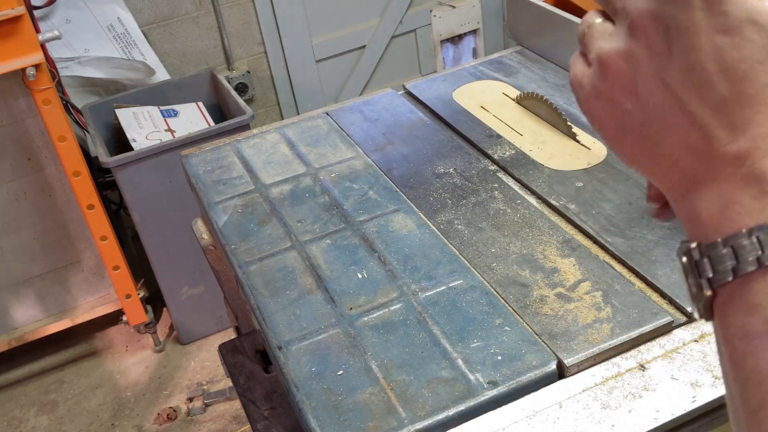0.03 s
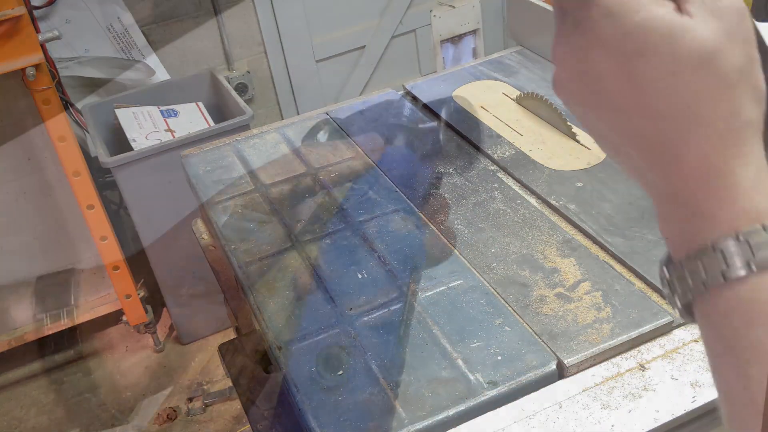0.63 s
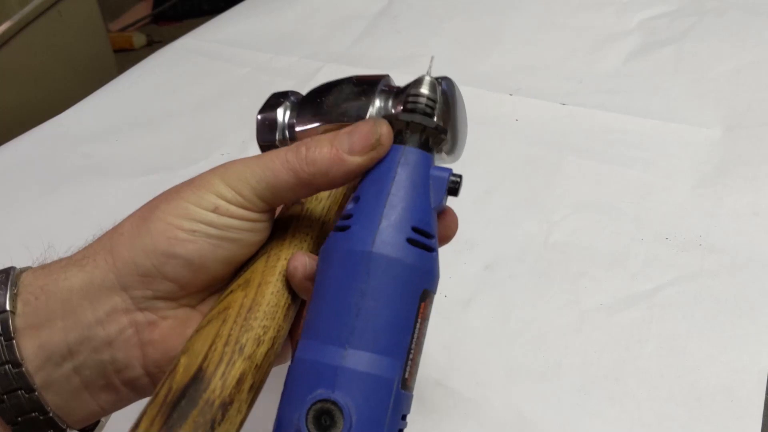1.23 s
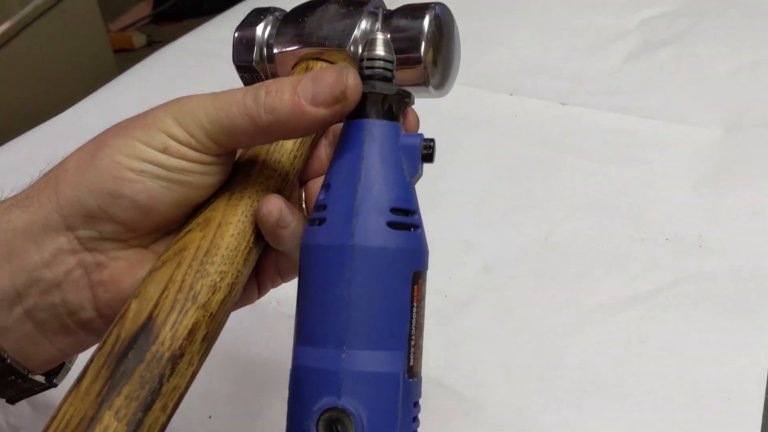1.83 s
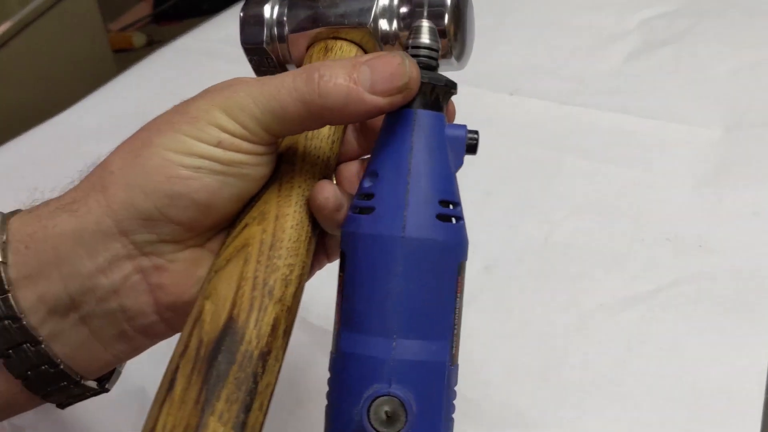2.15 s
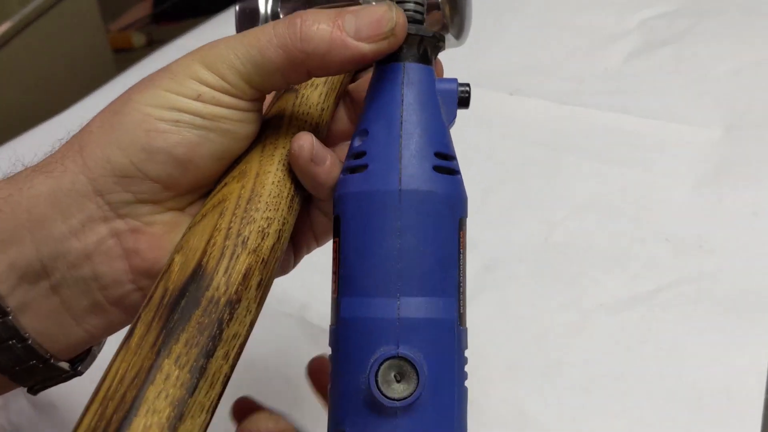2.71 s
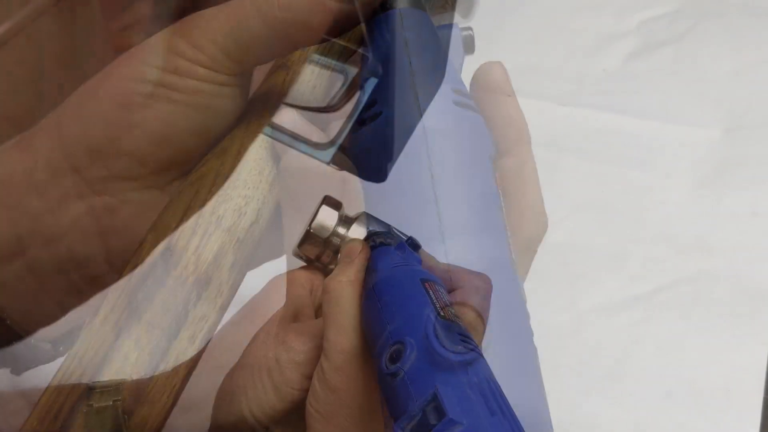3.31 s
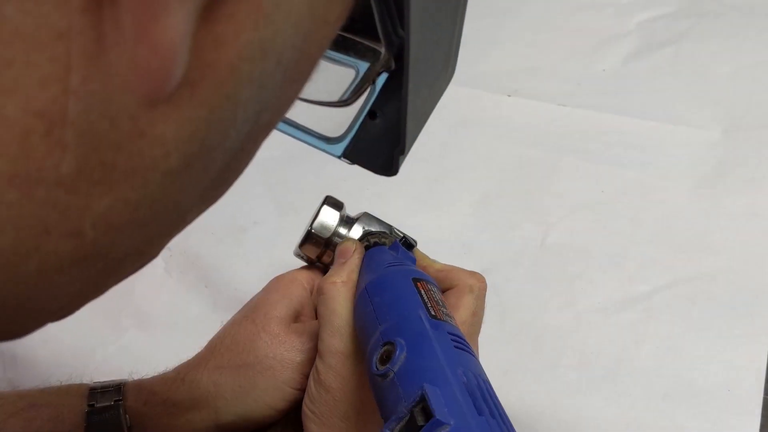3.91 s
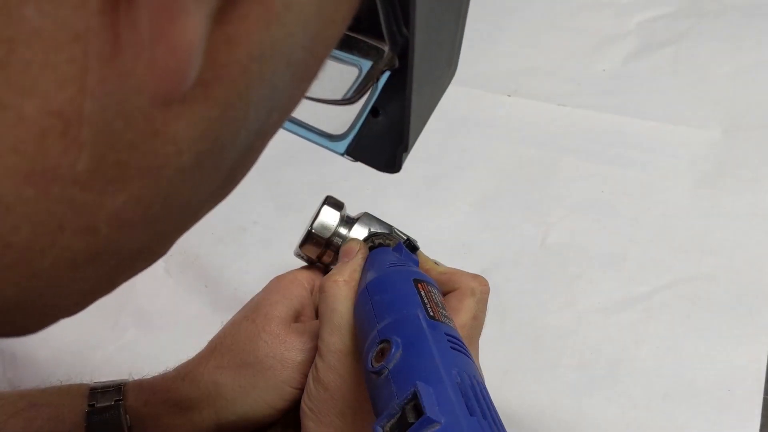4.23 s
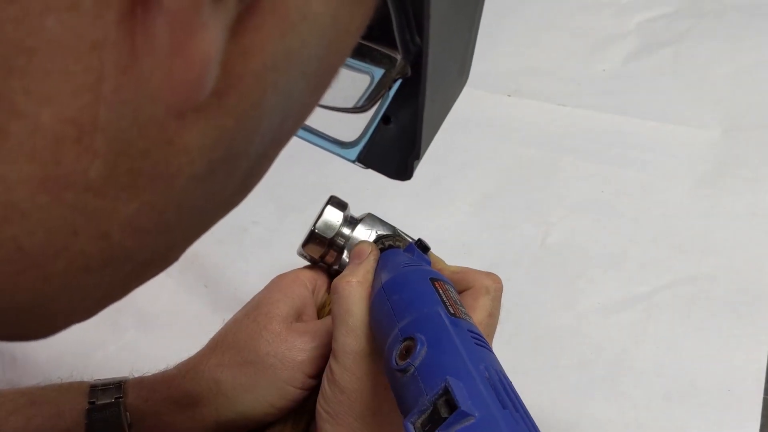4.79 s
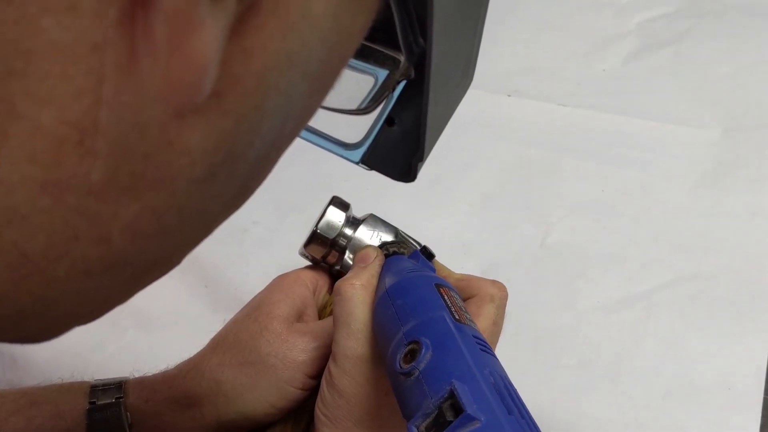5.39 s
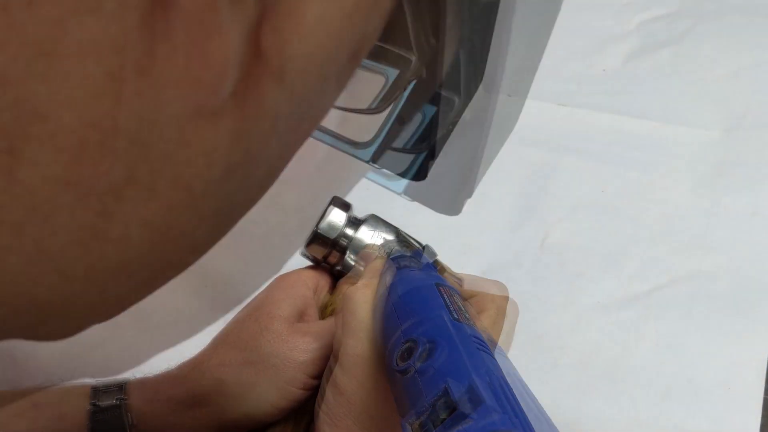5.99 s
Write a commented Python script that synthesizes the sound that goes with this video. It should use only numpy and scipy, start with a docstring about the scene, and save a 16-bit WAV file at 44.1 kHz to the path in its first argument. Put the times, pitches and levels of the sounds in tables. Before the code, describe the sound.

For the first second, hands rub and scrape softly over a workbench, with a few light knocks around 0.2 seconds and a faint low workshop rumble behind. At 1 second a switch snaps with a double click, and a handheld electric rotary tool starts with a crackly buzz. Its whine climbs quickly, then levels off amid a rush of cooling air. From about 2.4 to 2.8 seconds the air buffets the microphone on the left with low thumps. Between 3.1 and 3.6 seconds the free running blends into engraving on a steel hammerhead: a high whine with fine gritty hiss. In about six short strokes the pitch sags slightly and thin squealing overtones appear. Scratchy chatter comes near 4.2, 5.2, 5.7 and 6 seconds. From 5.6 seconds the sound begins blending into a heavier, slightly lower stroke, still running at the end.

```python
"""A mains rotary tool whines up to speed and engraves a steel hammerhead in a workshop. First hands rub
and knock over the bench and a switch snaps. Armature slots sing during the inrush of current; then
unbalance, fan and cooling air take over, and the air briefly buffets the left microphone. The free run
fades into the work: the burr hisses and chatters, the speed sags under each stroke, and overtones excite
the resonances of the steel. At the end the sound fades into a heavier stroke."""
import sys
import numpy as np
from scipy import signal
from scipy.fft import rfft, irfft
from scipy.io import wavfile
from scipy.ndimage import uniform_filter1d

SR = 44100
rng = np.random.default_rng(int(sys.argv[2]) if len(sys.argv) > 2 else 0)


def to_wav(sig):
    """Store sig (one row per channel, or 1-D mono) as 16-bit WAV at the path in sys.argv[1].

    Samples outside -1..1 are clipped; the rate is SR.
    """
    pcm = np.clip(np.atleast_2d(sig), -1, 1) * 32767
    pcm = np.round(pcm).astype(np.int16)
    wavfile.write(sys.argv[1], SR, pcm.T)  # frames by channels


N = 271215
T = np.arange(N) / SR

# Noise spectra. Each row: frequency in Hz, relative spectral density in dB.
RUMBLE_SPECTRUM = [(15, -32), (25, 11.5), (70, 11), (305, -0.5), (484, -5.5), (718, -7.5), (852, -11),
                   (1500, -5.5), (1950, -37), (3300, -120)]
QUIET_SPECTRUM = [(25, -24), (100, -7), (200, -10), (900, 1), (2000, -28), (8000, -36)]
SKIN_SPECTRUM = [(240, -27), (400, -9.5), (605, -10.5), (715, -13), (886, -10), (1050, -12), (3010, -5.5),
                 (7910, -12), (12100, -6), (15500, -13.5)]
SPARK_SPECTRUM = [(500, -7), (1500, -1), (4000, 9.5), (7000, -1), (12000, -4), (15500, -11)]
AIR_SPECTRUM = [(30, -48), (200, -34), (450, -16.5), (800, -11), (1150, -3), (1400, -2), (1750, 5.5),
                (2300, -4.5), (3500, -5.5), (7000, -9), (9000, -7.5), (11000, -3.5), (13000, -4.5),
                (15500, -11.5)]
GRIT_SPECTRUM = [(300, -28), (1400, -27.5), (2600, -23), (3600, -13.5), (5000, -8.5), (6800, 1),
                 (7900, -2.5), (8700, 2), (10500, 0), (12500, -3.5), (15500, -7)]
# Stereo images. Each row: frequency in Hz, coherence, left minus right in dB, left phase lead in radians.
ROOM_STEREO = [(60, 0.8, 0, 0), (1500, 1, 0, 0)]
SKIN_STEREO = [(693, 0.13, 1.5, -1.1), (2100, 0.23, 0.5, -0.43), (6050, 0.3, 0.5, -.7),
               (9000, 1, -1, -0.098), (12900, 0.8, -8, 0)]
AIR_STEREO = [(300, 0.84, 7, 0.1), (750, 0.78, -1.5, 0.33), (1800, 0.68, 4.5, 1.17), (3500, 0.62, 1, 2),
              (6340, 0.081, 5, 3), (9100, 1, -1, 0), (15000, 0.85, -7.5, 0)]
GRIT_STEREO = [(1370, 1, 0.5, 0), (3400, 1, -2.5, -0.46), (6660, 0.52, 2, 0.67), (9000, .5, 4.5, -.2),
               (10800, 0.33, 2, -0.79), (14000, .72, 0.5, .1)]
# Resonances of the scraped object, the switch, the tool (as driven by slots, unbalance and fan), the
# steel and the burr. Each row: frequency in Hz, bandwidth in Hz, gain in dB.
OBJECT_RESONANCES = [(417, 130, -12), (864, 110, -1), (1540, 65, -7), (2093, 89, 8.5), (3330, 130, -3.5),
                     (3430, 140, -12)]
SWITCH_RESONANCES = [(3180, 113, 8), (4440, 580, -18), (6200, 1000, 2.5), (8100, 760, -3),
                     (10100, 3200, 2.5), (13400, 3000, -10)]
SLOT_RESONANCES = [(2400, 310, -1), (3570, 1100, -14)]
UNBALANCE_RESONANCES = [(604.4, 12.6, 2.9), (1134, 130, 8.6)]
FAN_RESONANCES = [(9830, 210, 2.9)]
STEEL_RESONANCES = [(7250, 260, 0), (10780, 60, 0), (10970, 90, 2), (14400, 110, 0)]
BURR_RESONANCES = [(3070, 480, -5), (4420, 750, -1)]
# Room hums during handling, free run and work. Each row: frequency in Hz, level in dB.
EARLY_HUMS = [(119, -58.5), (241, -61.5), (479, -64)]
MIDDLE_HUMS = [(119, -62)]
LATE_HUMS = [(166.9, -71), (436.0, -78), (721.4, -65), (834.4, -83), (872.1, -77)]
# Sliding hands. Each row: start and end in seconds, hiss gain in dB, scrape gain in dB.
HAND_RUBS = [(0.0, 0.08, -61, -59.5), (0.091, 0.164, -46.5, -43.5), (0.158, 0.236, -56.5, -48),
             (0.28, 0.41, -51, -51.5), (0.416, 0.598, -47, -69), (0.622, 0.68, -57, -72),
             (0.701, 0.848, -50.5, -72), (0.888, 0.97, -52, -70)]
# Knocks on the object. Each row: time in seconds, peak of the ringing in dB, peak of the thud in dB.
OBJECT_KNOCKS = [(0.143, -43, -28), (0.188, -28, -57), (0.197, -25.5, -51)]
# Switch clicks. Each row: time in seconds, then gains of snap, housing ring and thud in dB.
SWITCH_CLICKS = [(0.992, -12, -29, -60), (1.092, -26, -21.5, -31.5)]
# Weak partials of shaft and bearings. Each entry: a multiple of the shaft rate; below, its gain in dB.
BEARING_ORDERS = [3, 4, 5, 5.43, 6, 7, 8, 9, 10, 11, 16, 17, 19]
BEARING_GAINS_DB = [-11, -12, -12, -16, -15, -15, -14.5, -16, -21, -24, -23, -12, -15]
# The hardest buffets of air. Each row: time in seconds, peak in dB, Gaussian width in seconds.
AIR_BUFFETS = [(2.421, -12.5, 0.0013), (2.447, -16, 0.001), (2.489, -6.5, 0.0007), (2.503, -8, 0.00043),
               (2.745, -25, 0.0012)]
# Strokes of the burr. Each row: touch and lift in seconds, shaft speed lost in Hz, squeal gain in dB.
BURR_STROKES = [(3.411, 3.849, 13.4, -1), (4.13, 4.509, 12.8, -1.5), (4.817, 5.069, 12.8, 1),
                (5.234, 5.451, 12.6, 1.5), (5.591, 5.794, 4.8, -1), (5.885, 6.114, 9.1, -5)]
# Overtones of the whine. Each row: harmonic number, gain in dB when free, gain in dB when cutting.
WHINE_OVERTONES = [(2, -41.5, -34), (3, -41.5, -33.5), (4, -48, -35.5)]
# Spells of chatter. Each row: start and end in seconds, level in dB.
CHATTER_SPELLS = [(4.147, 4.323, -45.5), (5.18, 5.225, -47.5), (5.6, 5.76, -50), (5.96, 6.027, -52)]
# The heavy stroke. Its row: touch and lift in seconds, shaft speed lost in Hz.
HEAVY_CUT = [(5.62, 6.09, 13.0)]
# Its whine. Each row: harmonic number, level in dB.
HEAVY_HARMONICS = [(1, -39.5), (2, -33.5), (3, -30.5), (4, -38)]
# Quick and slow parts of the spin-up. Each row: shaft speed gained in Hz, time constant in seconds.
SPIN_UP_STAGES = [(245.7, .127), (374.6, .62)]

MAINS_HZ, SWITCH_ON_S = 60, 0.992
WORK_SHAFT_HZ, HEAVY_SHAFT_HZ = 614.9, 599.5  # without load
TO_WORK_S, TO_HEAVY_S = (3.075, 3.58), (5.58, 6.56)  # start and end of the crossfades


def undb(db):
    """Decibels express an amplitude ratio logarithmically."""
    return 10 ** (np.asarray(db) / 20)


def fade(start, end):
    """A linear ramp from 0 to 1."""
    return np.clip((T - start) / (end - start), 0, 1)


def gate(start, end, attack_s, release_s):
    """An envelope rises linearly, holds, and decays exponentially after the end."""
    return fade(start, start + attack_s) * np.exp(-np.clip((T - end) / release_s, 0, 40))


def pan(db):
    """A level difference, left minus right, places a source."""
    return undb(np.array([[.5], [-.5]]) * db)


def walk(rate):
    """Slow random modulation: steps held 1 / rate seconds and smoothed twice, with spread near 1."""
    hold = max(int(SR / rate), 1)
    steps = np.repeat(rng.standard_normal(N // hold + 1), hold)
    return 1.3 * uniform_filter1d(uniform_filter1d(steps, hold), hold)[:N]


def noise(spectrum, image, band):
    """Partly coherent stereo noise; the mean of its channels has rms 1 inside the band."""
    hz = np.maximum(np.fft.rfftfreq(N, 1 / SR), 1)

    def curve(rows, column):
        rows = np.array(rows)
        return np.interp(np.log(hz), np.log(rows[:, 0]), rows[:, column])

    coherence, sign = np.clip(curve(image, 1), -1, 1), np.array([[1], [-1]])
    mid, side = rfft(rng.standard_normal((2, N)))
    bins = (mid * np.sqrt(1 + coherence) + sign * side * np.sqrt(1 - coherence)) * undb(curve(spectrum, 1))
    bins = bins * pan(curve(image, 2)) * np.exp(.5j * sign * curve(image, 3))
    in_band = bins.mean(0) * (hz > band[0]) * (hz < band[1])
    return irfft(bins, N) / irfft(in_band, N).std()


def tone(angle, db, scatter, lead=0, rate=25):
    """Turbulence and reflections scatter a tone, so it wavers differently in each channel."""
    paths = np.array([1 + scatter * (walk(rate) + 1j * walk(rate)) for _ in range(2)])
    phase = angle + lead * np.array([[.5], [-.5]])
    return np.sqrt(2) * undb(db) * np.imag(paths * np.exp(1j * phase))


def highpass(x, hz, order):
    """A Butterworth filter attenuates what lies below its cutoff."""
    return signal.sosfilt(signal.butter(order, hz, "high", fs=SR, output="sos"), x)


def ring(x, modes):
    """Modal superposition: the responses of separate resonances add."""
    return sum(undb(db) * signal.lfilter(*signal.iirpeak(hz, hz / width, SR), x)
               for hz, width, db in modes)


def impact(start, peak_db, modes, decay_s):
    """A short gritty contact is a broadband force that excites all modes at once."""
    age = np.maximum(T - start, 0)
    force = rng.standard_normal(N) * (T >= start) * np.exp(-np.minimum(age / decay_s, 40))
    response = ring(force + 1e-18, modes)
    return response * undb(peak_db) / np.abs(response).max()


def workshop():
    """Background noise: rumble and steady hums superpose, and grow quieter in two steps."""
    def hums(table):
        return sum(tone(2 * np.pi * hz * T, db, scatter=0.028) for hz, db in table)

    middle, late = fade(0.51, 1.12), fade(2.95, 3.55)
    rumble = noise(RUMBLE_SPECTRUM, ROOM_STEREO, band=(25, 300))
    rumble *= undb(-53.5 - 10 * middle + 1.04 * walk(12.5))
    quiet = noise(QUIET_SPECTRUM, ROOM_STEREO, band=(25, 1000)) * undb(-72.5)
    early = rumble + (1 - middle) * hums(EARLY_HUMS) + middle * hums(MIDDLE_HUMS)
    return (1 - late) * early + late * (quiet + hums(LATE_HUMS))


def rubbing():
    """Stick-slip friction: skin hisses in tiny catches and a scraped object resonates."""
    hiss_gain = scrape_gain = 0
    for start, end, hiss_db, scrape_db in HAND_RUBS:
        touch = gate(start, end, attack_s=0.036, release_s=0.018)
        hiss_gain += touch * undb(hiss_db)
        scrape_gain += touch * undb(scrape_db)
    between_rubs = undb(-56) * (1 - fade(0.5, 2.3))
    hiss = noise(SKIN_SPECTRUM, SKIN_STEREO, band=(9000, 15500)) * undb(1.3 * walk(400) + 1.17)
    scrape = ring(rng.standard_normal(N) * undb(1.7 * walk(249)), OBJECT_RESONANCES)
    return hiss * np.hypot(hiss_gain, between_rubs) + scrape / scrape.std() * scrape_gain


def knocks():
    """Impacts set the object into damped free vibration over a dull thud."""
    return sum(impact(start, ring_db, OBJECT_RESONANCES, decay_s=0.0027)
               + impact(start, thud_db, [(424, 170, 0)], decay_s=0.0026)
               for start, ring_db, thud_db in OBJECT_KNOCKS)


def switch():
    """Impulsive excitation rings switch and housing; reverberation adds a short tail."""
    out = 0
    for start, snap_db, ring_db, thud_db in SWITCH_CLICKS:
        snap = np.array([impact(start, snap_db, SWITCH_RESONANCES, decay_s=0.0017) for _ in range(2)])
        housing = impact(start, ring_db, [(4070, 580, 2), (3170, 160, -6)], decay_s=0.0011)
        housing += impact(start, thud_db, [(637, 110, 0)], decay_s=0.0011)
        tail = [impact(start, snap_db - 10.5, SWITCH_RESONANCES, decay_s=0.019) for _ in range(2)]
        out += pan(1) * (snap + 0.32 * snap[::-1]) + pan(15) * housing + np.array(tail)
    return out


def armature(angle, inrush, mains, slots=8):
    """Forced vibration: passing slots pull on the housing in proportion to the current."""
    # The current is ragged, and the slots are uneven around the turn.
    current = inrush * undb(1.5 * walk(400)) * (0.069 + mains) * (1 + 0.19 * np.sin(angle))
    pull = sum(k ** -1.72 * np.sin(slots * k * angle) for k in range(1, 6))
    # The small housing radiates little below its first resonance.
    radiated = highpass(pull * current, hz=2150, order=8)
    return pan(4.1) * undb(-11.5) * ring(radiated, SLOT_RESONANCES)


def sparks(speed, inrush, mains):
    """Sparking at the brushes radiates broadband noise that scales with current and speed."""
    crackle = noise(SPARK_SPECTRUM, AIR_STEREO, band=(1500, 15500)) * undb(-30.5 + 2 * walk(700))
    return crackle * inrush * speed * (1.2 + 0.22 * mains)


def air_and_bearings(angle, speed, mains):
    """Flow noise grows as a power of speed; raspy bearing partials grow faster still."""
    air = noise(AIR_SPECTRUM, AIR_STEREO, band=(1200, 2200)) * undb(-32 + 0.5 * walk(30.08))
    air *= 1 + 0.049 * (mains - .5)
    bearings = sum(tone(k * angle, -33 + db + 2 * walk(7.02), scatter=0.95, lead=k, rate=60)
                   for k, db in zip(BEARING_ORDERS, BEARING_GAINS_DB))
    return (air + bearings * speed ** 2) * speed ** 1.78 * fade(1.0, 1.023)


def unbalance(angle, speed):
    """Rotating unbalance hums at the shaft rate and its octave, sweeping through resonances."""
    fundamental = pan(6.6) * tone(angle, -37.5 + 1.34 * walk(9), scatter=0.099, lead=1.0)
    octave = pan(0.54) * tone(2 * angle, -54 + 2 * walk(8.63), scatter=0.25, lead=0.6)
    hum = (fundamental + octave) * speed ** 4.04
    return hum + ring(hum, UNBALANCE_RESONANCES)


def fan(angle, speed):
    """A blade-passing tone: the small fan radiates only once its blades pass fast enough."""
    whine = pan(-4) * tone(18 * angle, -33 + 2 * walk(14.57), scatter=0.62, rate=60)
    whine = highpass(whine * speed ** 3.9, hz=7000, order=8)
    return whine + ring(whine, FAN_RESONANCES)


def shaft(hz, jitter):
    """Shaft angle is the integral of a slightly uneven speed."""
    return 2 * np.pi * np.cumsum(hz * (1 + jitter * walk(70))) / SR


def free_run():
    """The unloaded motor approaches full speed exponentially while its inrush current falls."""
    age = np.maximum(T - SWITCH_ON_S, 0)
    hz = sum(gained_hz * (1 - np.exp(-age / lag_s)) for gained_hz, lag_s in SPIN_UP_STAGES)
    speed = hz / hz.max()
    angle = shaft(hz, jitter=0.00089)
    inrush = np.maximum(1 - speed / 0.87, 0) ** 1.01  # ends at 87 % of full speed
    mains = np.cos(2 * np.pi * MAINS_HZ * T) ** 2  # two pulses a cycle
    electrical = armature(angle, inrush, mains) + sparks(speed, inrush, mains)
    return electrical + air_and_bearings(angle, speed, mains) + unbalance(angle, speed) + fan(angle, speed)


def air_jet(start=2.39, end=2.755):
    """Turbulent pressure: eddies from the vents push on the left microphone; the right is sheltered."""
    spectrum = [(25, -3), (70, -4), (200, -6.5), (380, -14), (600, -37), (1500, -55), (6000, -90)]
    eddies = noise(spectrum, [(100, 0, 0.0038, 0)], band=(20, 600))
    flow = gate(start, end, attack_s=0.033, release_s=0.007)
    flow *= undb(-30 - 7 * (T - start) + 3.03 * walk(60))
    pushes = sum(undb(db) * np.exp(-.5 * ((T - time) / width) ** 2) for time, db, width in AIR_BUFFETS)
    wind = eddies * flow * undb([[0], [-22]]) + pushes * undb([[0], [-26]])
    return highpass(wind, hz=15, order=1)


def sag(strokes):
    """Load slows the shaft steadily during a cut; the lost speed returns when the burr lifts."""
    return sum(hz * gate(touch, lift, lift - touch, release_s=0.062) for touch, lift, hz, *_ in strokes)


def partial(angle, db):
    """Random modulation makes one harmonic of the whine waver."""
    return pan(1) * tone(angle, db + 2 * walk(18), scatter=0.33, lead=-1.12, rate=55)


def grit(db):
    """The spinning burr gives a fine broadband hiss with a flickering amplitude."""
    hiss = noise(GRIT_SPECTRUM, GRIT_STEREO, band=(8000, 10300))
    return hiss * undb(db + 1.05 * walk(900) + 0.47 * walk(25.15))


def engraving():
    """The tool whines at six times its shaft rate; in a cut, overtones force the steel to resonate."""
    lost_hz = sag(BURR_STROKES)
    droop_hz = 4.075 * np.maximum(T - 4.086, 0)  # the motor slowly tires
    angle = 6 * shaft(WORK_SHAFT_HZ - droop_hz - lost_hz, jitter=.0004)
    touches = [(gate(touch, lift, attack_s=0.038, release_s=0.01), db)
               for touch, lift, _, db in BURR_STROKES]
    contact = np.minimum(sum(envelope for envelope, _ in touches), 1)
    drive = sum(envelope * undb(db) for envelope, db in touches)
    whine_db = -32 - 0.16 * lost_hz
    whine = pan(2.6) * tone(angle, whine_db, scatter=0.08, lead=0.32)
    free = sum(partial(k * angle, db) for k, db, _ in WHINE_OVERTONES) * (1 - contact)
    cutting = sum(partial(k * angle, db) for k, _, db in WHINE_OVERTONES) * drive
    squeal = ring(cutting, STEEL_RESONANCES)
    # A 720 Hz hum leaves a faint sideband above the whine.
    hum_angle = 2 * np.pi * 12 * MAINS_HZ * T
    sideband = tone(angle + hum_angle, whine_db - 22, scatter=0.75)
    return whine + free + squeal + sideband + grit(db=-37.5)


def chatter():
    """Intermittent contact: the burr skips on the steel and resonates in short scratchy spells."""
    spells = sum(undb(db) * gate(start, end, attack_s=0.014, release_s=0.056)
                 for start, end, db in CHATTER_SPELLS)
    catches = rng.standard_normal(N) * undb(3.2 * walk(300))
    skips = ring(ring(catches, BURR_RESONANCES), BURR_RESONANCES)
    return pan(2.5) * skips / skips.std() * spells


def heavy_stroke():
    """A slower shaft lowers the harmonic series; here the overtones outweigh the fundamental."""
    angle = 6 * shaft(HEAVY_SHAFT_HZ - sag(HEAVY_CUT), jitter=.0005)
    return sum(partial(k * angle, db) for k, db in HEAVY_HARMONICS) + grit(db=-38.5)


def scene():
    """The sources superpose; the tool crossfades from free run to engraving to the heavy stroke."""
    working, heavy = fade(*TO_WORK_S), fade(*TO_HEAVY_S)
    handling = rubbing() + knocks() + switch()
    tool = free_run() * (1 - working) + engraving() * working * (1 - heavy) + heavy_stroke() * heavy
    return handling + tool + chatter() + workshop() + air_jet()


def record(dry):
    """Band limiting: a steep low-pass filter removes the treble above 15.9 kHz."""
    return signal.sosfilt(signal.ellip(10, .2, 80, 15900, fs=SR, output="sos"), dry)


dry = scene()
out = record(dry)
to_wav(out)
```